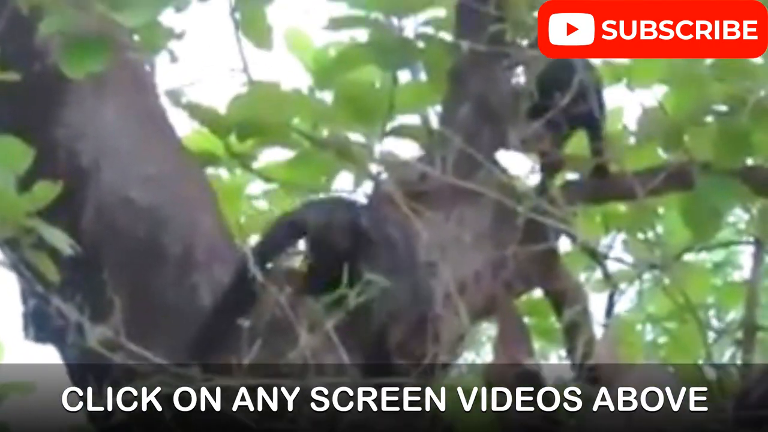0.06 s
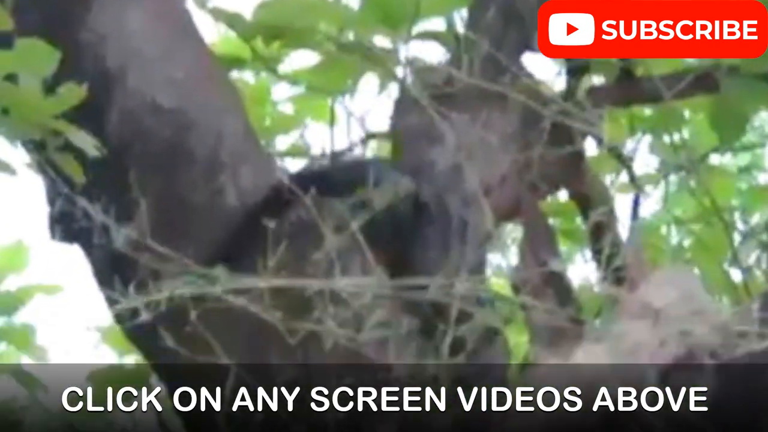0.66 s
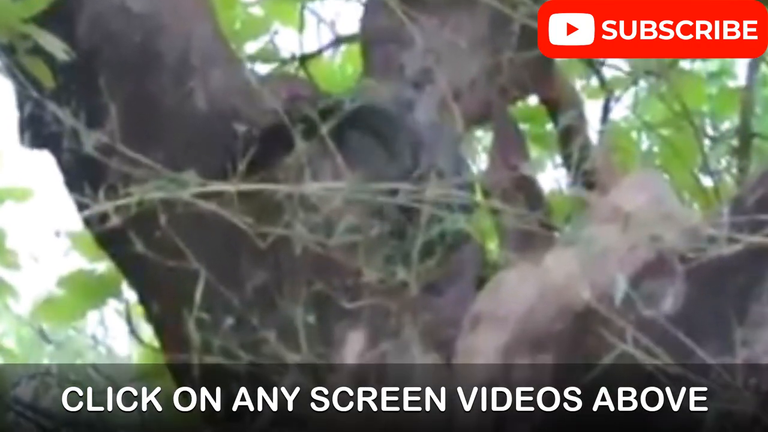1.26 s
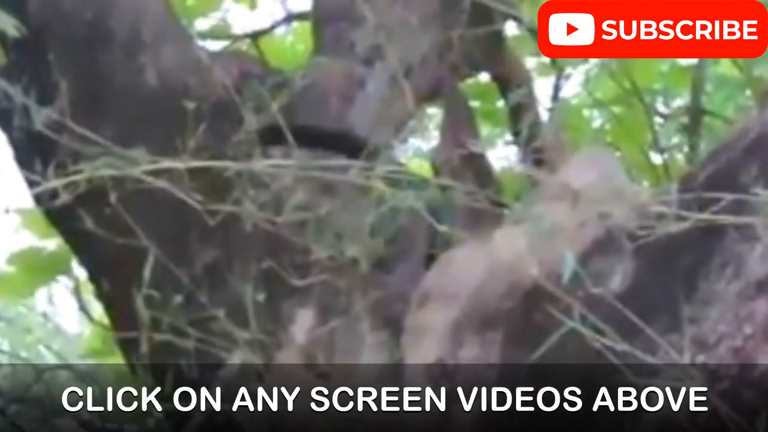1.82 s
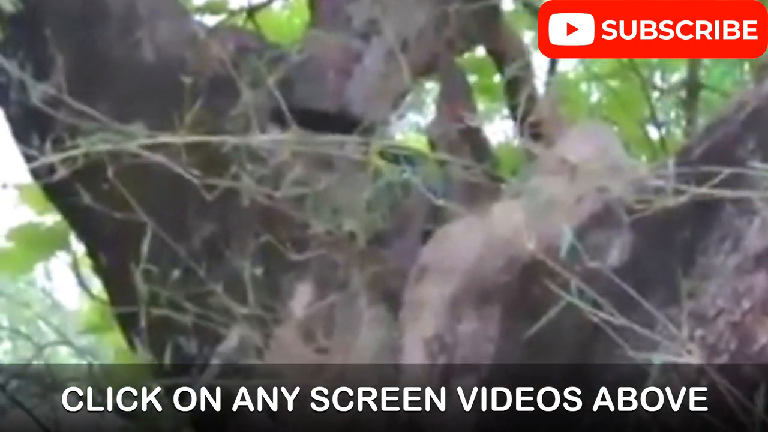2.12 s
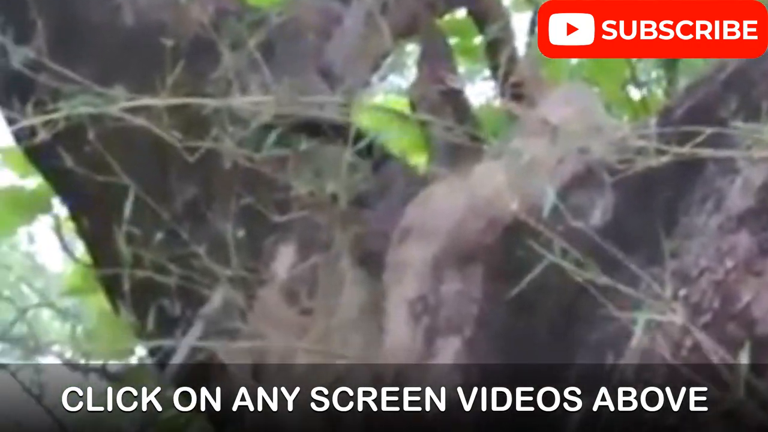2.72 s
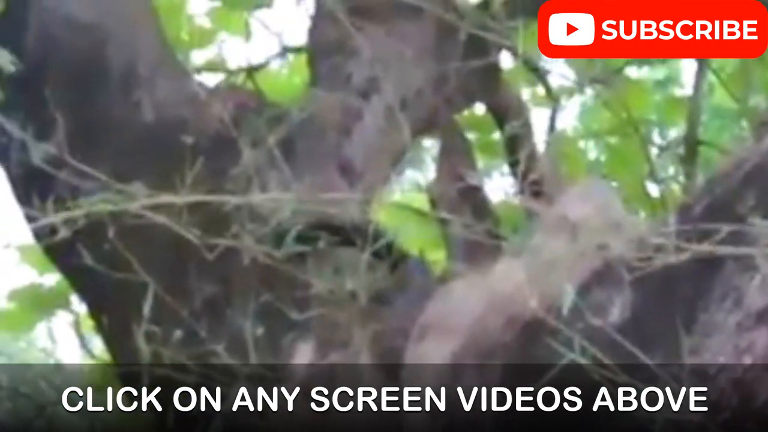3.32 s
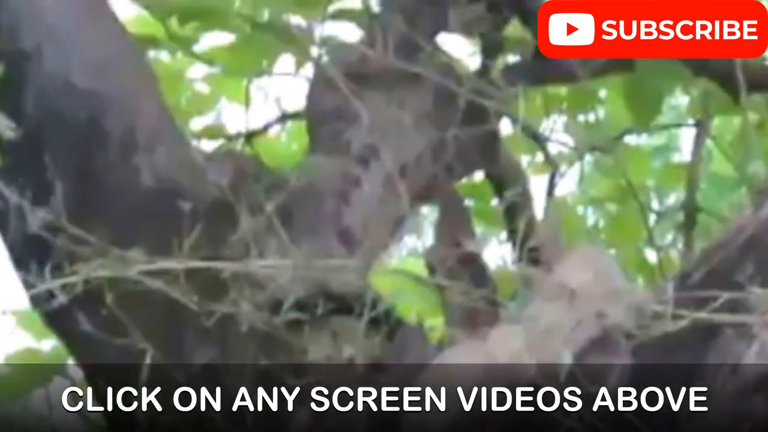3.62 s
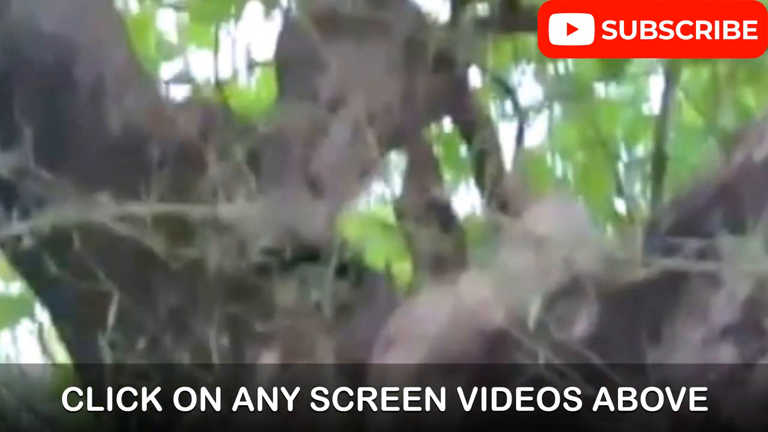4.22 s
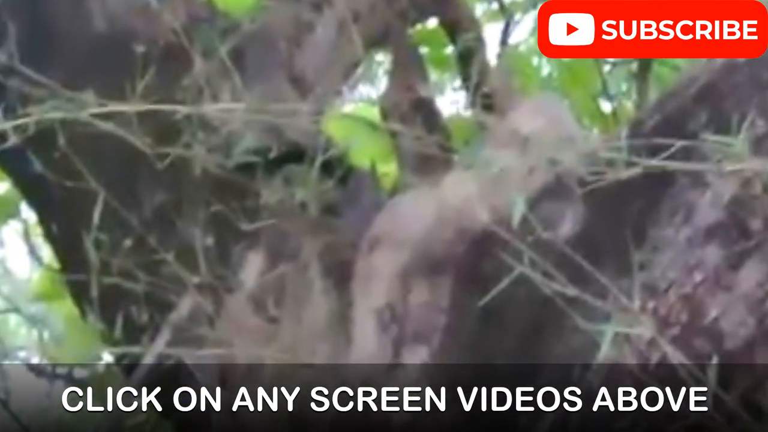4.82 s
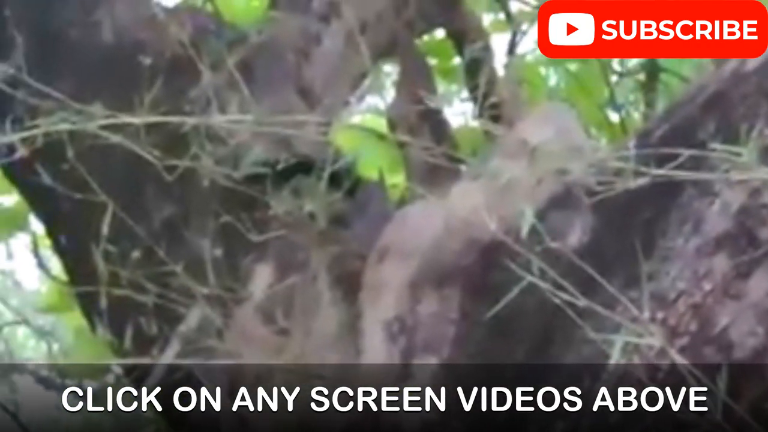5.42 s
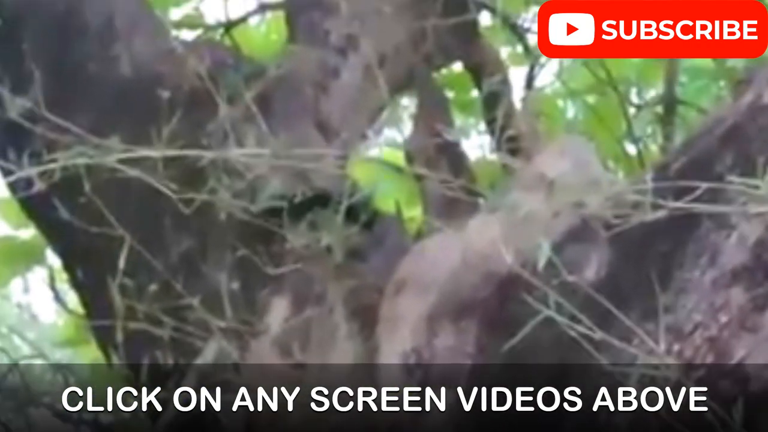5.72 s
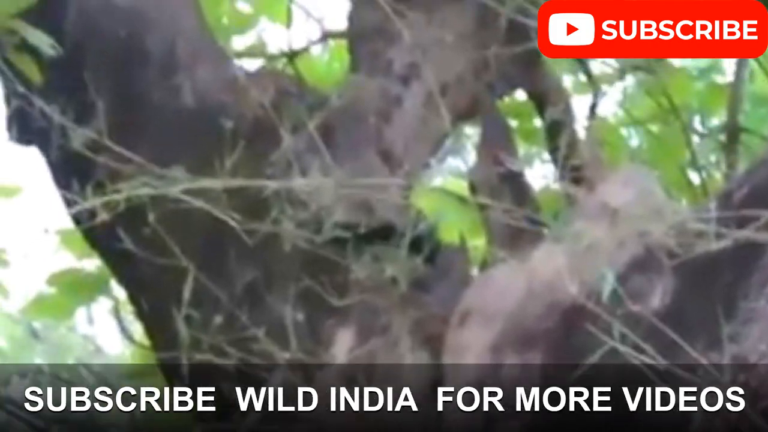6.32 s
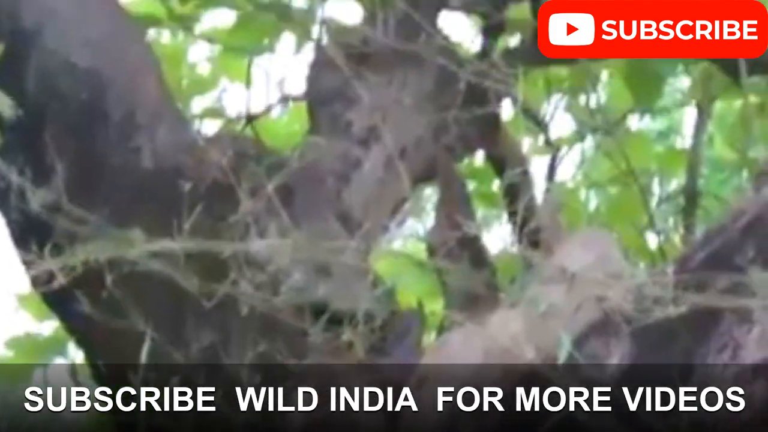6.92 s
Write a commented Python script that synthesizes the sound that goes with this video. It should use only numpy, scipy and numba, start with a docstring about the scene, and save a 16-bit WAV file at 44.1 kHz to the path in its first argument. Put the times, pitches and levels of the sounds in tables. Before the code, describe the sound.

A palm civet screeches in quick, shrill runs from a tree, pausing briefly midway, in otherwise quiet woods.

```python
"""A palm civet screeching in a tree

Pulses of the vocal folds excite the resonances of throat and mouth: each screech starts as a low creak,
sweeps up to a shriek, swings in pitch and ends in a squeak. Between screeches the animal rasps, grunts
and scrapes on the bark. Trunks and leaves scatter the sound over quiet air, soft bumps and one faint,
distant hoot, and a fast limiter holds the shrieks at one level."""
import sys
import numpy as np
from scipy import signal
from scipy.fft import rfft, irfft
from scipy.io import wavfile
from scipy.ndimage import uniform_filter1d
from numba import njit

SR = 44100
rng = np.random.default_rng(int(sys.argv[2]) if len(sys.argv) > 2 else 0)


def log_audio(samples):
    """Write samples as a 16-bit WAV file to the path given in sys.argv[1]."""
    # one column per channel
    frames = np.atleast_2d(samples).T
    # limit to full scale, then quantise
    limited = np.clip(frames, -1, 1)
    pcm = np.round(limited * 32767).astype(np.int16)
    wavfile.write(sys.argv[1], SR, pcm)


N = 306936
T = np.arange(N) / SR

# spectra of still air and of an earlier call ringing in the wood: (frequency [Hz], gain [dB])
AIR_SPECTRUM = [(25, -37), (50, -17.5), (80, -2.5), (125, 0.5), (200, -7.5), (320, -21.5), (700, -15.5),
                (1500, -35.5), (5000, -43.5), (13000, -53)]
RINGING_SPECTRUM = [(400, -22.5), (900, -26), (1280, 4), (1700, -21.5), (2400, -21.5), (3500, -10),
                    (4500, -26.5), (8000, -27.5)]
# low bumps and one faint, distant hoot; scrapes on bark and leaves:
# (peak time [s], level [dB], rise [s], t60 [s], centre [Hz])
BUMPS_AND_HOOT = [(.005, -25, .004, 0.58, 111), (.032, -24.5, .006, 0.56, 104), (.13, -23, .008, 0.17, 114),
                  (1.02, -30.5, .02, 0.55, 103.6), (1.19, -33.5, .02, 1, 120.8),
                  (3.98, -53, .01, 0.32, 560), (4.19, -43, .012, 0.13, 147.4),
                  (4.325, -48.5, .03, 0.34, 227)]
BARK_SCRAPES = [(4.165, -43.5, 0.012, 0.11, 5550), (4.205, -48, .012, 0.14, 4780),
                (4.235, -33.5, 0.0063, 0.061, 4840), (4.265, -41.5, 0.0012, 0.25, 3780)]
# reflections from the nearest limbs: (delay [s], gain [dB])
LIMB_ECHOES = [(.0013, -26.5), (.0031, -21.5), (.0083, -14.5), (0.0148, -17.5)]
# scatter from the trees: (frequency [Hz], gain [dB], t60 [s])
TREE_SCATTER = [(300, -7.5, 0.21), (676, -5.5, 0.36), (1403, -14, 0.71), (2200, -12.5, 0.55),
                (3600, -9, 0.63), (4300, -12.5, 0.58), (6450, -19.5, 0.63), (9310, -16.5, 0.48),
                (12000, -20.5, 0.48)]
# envelope of the voiceless rasp: (time [s], level [dB])
RASP_ENVELOPE = [(1.042, -57.5), (1.049, -14.5), (1.06, -24), (1.08, -21), (1.12, -21), (1.17, -22.5),
                 (1.195, -24), (1.24, -87.5)]
# its spectrum: (frequency [Hz], gain [dB])
RASP_SPECTRUM = [(150, -22), (350, -12), (550, -5.5), (900, -9), (1500, -3), (2100, -15.5), (3500, -14.5),
                 (6000, -33), (9500, -24), (13000, -47.5)]
# the airway's low, middle and high resonance regions: (frequency [Hz], gain [dB])
THROAT_RESPONSE = [(200, -38.5), (420, -7.5), (600, 0.5), (800, 1.5), (1050, 8.5), (1300, 4.5), (1600, 3.5),
                   (1900, 3.5), (2350, 5.5), (2800, -3.5), (3500, -9.5), (4400, -47.5), (7000, -95.5)]
SHRIEK_RESPONSE = [(1200, -34.5), (2200, -23.5), (3000, 6), (3700, 4), (4400, 6.5), (5500, 9), (6900, 10),
                   (7600, 12), (8600, -6.5), (11000, -31.5)]
EDGE_RESPONSE = [(4000, -70.5), (6500, -24.5), (7700, -5), (8600, -11.5), (9400, -12), (10200, -9.5),
                 (10900, -15), (11600, -16), (12800, -29.5), (14000, -10.5)]
# their balance by pitch: (pitch [Hz], throat level at a sweep's top [dB], edge relative to shriek [dB])
REGISTER_BALANCE = [(1050, -18, -11.5), (1500, -16.5, -14), (1985, -24.5, -4.5), (2560, -18, 0.5),
                    (3300, -14, 0.5)]
# rising grunts: (start [s], end [s], first pitch [Hz], last pitch [Hz], level [dB])
GRUNT_GLIDES = [(1.158, 1.19, 1150, 1550, -16.5), (2.231, 2.262, 480, 1250, -21.5),
                (4.52, 4.542, 281.2, 600, -26), (4.689, 4.712, 278.8, 600.4, -23.5)]
# screeches: (start [s], mouth opens [s], mouth shuts [s], end [s], creak pitch [Hz], creak level [dB],
# opening level [dB], opening mouth resonance [Hz], squeak pitch [Hz], squeak level [dB])
SCREECH_CALLS = [(.113, .177, .32, .342, 230, -17, -10, 4000, 1380, -12),
                 (.468, .493, .935, .968, 330, -19, -3, 4500, 1270, -8),
                 (1.317, 1.381, 1.538, 1.558, 220, -18, -12, 5000, 1600, -9),
                 (1.687, 1.712, 2.05, 2.082, 330, -21, 0, 4700, 1520, -12),
                 (2.387, 2.402, 2.757, 2.78, 280, -24, 5, 5400, 1850, -13),
                 (2.912, 2.939, 3.052, 3.138, 230, -24, -6, 5200, 1560, -13),
                 (3.31, 3.369, 3.642, 3.68, 120, -26, -3, 3800, 1560, -18),
                 (4.852, 4.892, 5.02, 5.045, 280, -19, 2, 5300, 1480, -14),
                 (5.172, 5.197, 5.655, 5.679, 230, -26, 3, 6000, 1380, -17),
                 (5.995, 6.02, 6.297, 6.324, 200, -23, 1, 5000, 1720, -16),
                 (6.636, 6.664, 6.96, 6.99, 180, -27, 4, 5400, 1640, -25)]
# swings of pitch up to a top and down to a held note: (top time [s], top pitch [Hz], rise [s], fall [s],
# held pitch [Hz], roundness [1 pointed, 2 bell], top level [dB], held level [dB],
# held throat level [dB], edge offset [dB], mouth resonance [Hz], roughness [0-1])
PITCH_SWEEPS = [(.226, 2698, .074, .056, 1324, 1.7, 6, 6, -28, -7, 5200, .35),
                (.562, 3539, .052, .042, 1328, 2.0, 10, 8, -42, -5, 5500, .15),
                (.718, 1699, .038, .031, 1494, 1.1, 6, -4, -34, -2, 5000, .25),
                (.871, 2122, .04, .05, 1044, 1.6, 5, -8, -26, -3, 4050, .45),
                (1.423, 3546, .054, .039, 1826, 1.9, 7, 2, -30, -6, 5800, .22),
                (1.486, 1968, .019, .021, 1646, 1.2, 5, 7, -28, -3, 5600, .25),
                (1.777, 3645, .049, .037, 1215, 1.9, 15, 8, -27, -3, 5800, .3),
                (1.966, 3597, .043, .039, 1299, 2.0, 0, -5, -19, 11, 5600, .4),
                (2.458, 3437, .045, .027, 1638, 1.7, 1, 3, -45, 6, 6050, .4),
                (2.591, 3467, .036, .051, 1487, 2.0, 6, 6, -44, 0, 5900, .12),
                (2.989, 3361, .034, .033, 1092, 1.6, 6, 6, -20, -2, 6000, .35),
                (3.418, 3438, .048, .036, 1365, 2.0, 10, 3, -26, -7, 5900, .33),
                (3.601, 3280, .041, .028, 1530, 2.1, 1, 4, -25, 8, 5900, .45),
                (4.953, 2764, .047, .033, 1167, 1.6, 5, 7, -28, 2, 5700, .95),
                (5.261, 2793, .051, .025, 1598, 1.7, 2, 0, -44, 2, 6500, .5),
                (5.396, 3402, .037, .036, 1314, 1.7, -5, 0, -40, 8, 6200, .25),
                (5.587, 1487, .042, .051, 1174, 2.3, 7, 5, -30, 6, 6300, .22),
                (6.07, 3644, .04, .029, 1535, 2.0, 9, 3, -40, 1, 5900, .3),
                (6.216, 3435, .037, .037, 1559, 2.3, 5, 5, -36, 2, 5900, .27),
                (6.722, 3313, .043, .023, 1527, 1.9, 12, 10, -42, -4, 6200, .2),
                (6.874, 3290, .037, .031, 1645, 2.2, 6, 10, -45, -3, 6400, .17)]
# threshold of the noise suppressor: (frequency [Hz], level [dB])
HUSH_THRESHOLD = [(60, -93.5), (200, -92.5), (400, -79), (1000, -70), (2500, -70), (5000, -72),
                  (12000, -80)]
TOP_HZ = 12900


def undb(db):
    """Amplitude ratio of a level in decibels."""
    return 10 ** (np.asarray(db) / 20)


def unit(x):
    """Normalisation to an rms of one."""
    return x / np.sqrt(np.mean(x ** 2))


def smooth(x, seconds):
    """Low-pass filtering by two running means in cascade."""
    size = 2 * int(seconds * SR / 2) + 1
    return uniform_filter1d(uniform_filter1d(x, size, mode="nearest"), size, mode="nearest")


def steady(x, seconds=0.0076):
    """Division by the running rms evens the level as harmonics cross a resonance."""
    return x / np.sqrt(np.maximum(smooth(x ** 2, seconds), 0) + np.mean(x ** 2) / 10 ** 6)


def bell(t, rise, fall, roundness):
    """Asymmetric generalised Gaussian, equal to one at t = 0."""
    return np.exp(-np.abs(t / np.where(t < 0, rise, fall)) ** roundness)


def colour(x, points, size=2048):
    """Minimum-phase filter through points of (frequency [Hz], gain [dB])."""
    hz, db = np.transpose(points)
    log_f = np.log(np.fft.rfftfreq(size, 1 / SR) + 1)
    log_gain = np.log(undb(np.interp(log_f, np.log(hz), db)))
    cepstrum = irfft(log_gain)[:size // 2]
    cepstrum[1:] *= 2
    return signal.fftconvolve(x, irfft(np.exp(rfft(cepstrum, size))))[:len(x)]


def noise(points):
    """Spectrally shaped Gaussian noise of unit rms."""
    return unit(colour(rng.standard_normal(N), points))


def flutter(seconds):
    """Random modulation of unit rms on the given time scale."""
    return unit(smooth(rng.standard_normal(N + SR), seconds)[SR // 2:SR // 2 + N])


@njit
def resonance(x, hz, width_hz):
    """Second-order resonator whose centre frequency may move every sample."""
    y, band, low = np.empty(len(x)), 0., 0.
    for i in range(len(x)):
        g, damping = np.tan(np.pi * hz[i] / SR), width_hz / hz[i]
        v = (band + g * (x[i] + 1e-18 - low)) / (1 + g * (g + damping))
        band, low = 2 * v - band, low + 2 * g * v
        y[i] = damping * v
    return y


@njit
def follow(x, attack, release):
    """Envelope detection: a one-pole lag with separate rates for rise and fall."""
    out, envelope = np.empty(len(x)), 0.
    for i in range(len(x)):
        envelope += (x[i] - envelope) * (attack if x[i] > envelope else release)
        out[i] = envelope
    return out


def air(level_db=-56, breeze_db=1.5):
    """Ambient noise: a low rumble, slowly amplitude-modulated by the breeze."""
    breeze = undb(breeze_db * flutter(.08))
    return noise(AIR_SPECTRUM) * undb(level_db) * breeze


def ringing(level_db=-27, t60=0.64):
    """Reverberant decay: the tail of an earlier call dies away exponentially."""
    return noise(RINGING_SPECTRUM) * undb(level_db) * np.exp(-np.log(1000) * T / t60)


def noise_bursts(rows, relative_width, grain_db):
    """Band-limited noise: each bump, hoot or scrape is a grainy band that swells and decays."""
    out = np.zeros(N)
    for peak_s, db, rise, t60, hz in rows:
        band = rng.standard_normal(N)
        for _ in range(2):
            band = resonance(band, np.full(N, float(hz)), float(hz * relative_width))
        age = T - peak_s
        envelope = np.exp(np.minimum(age, 0) / rise - np.log(1000) * np.maximum(age, 0) / t60)
        out += undb(db) * unit(band) * envelope
    return out * undb(grain_db * flutter(0.00017))


def wood(x, build_s=.018, steepening=1.397):
    """Reflection and scattering: near limbs echo at once, and the trees add a diffuse tail."""
    t = T[:SR]
    hz, db, t60 = np.transpose(TREE_SCATTER)
    log_f = np.log(np.fft.rfftfreq(SR, 1 / SR) + 1)
    spectrum = rfft(rng.standard_normal(SR))
    response = np.zeros(SR)
    for k, share in enumerate(np.eye(len(hz))):
        band = irfft(spectrum * np.interp(log_f, np.log(hz), share), SR)
        # the echo tail builds up, then dies away ever faster
        shape = (1 - np.exp(-(t / build_s) ** 2)) * np.exp(-np.log(1000) * (t / t60[k]) ** steepening)
        response += undb(db[k]) * band * shape / np.sqrt(np.sum(shape ** 2))
    for delay, echo_db in LIMB_ECHOES:
        response[int(delay * SR)] += undb(echo_db)
    return x + signal.fftconvolve(x, response)[:N]


def rasp(rattle_db=3):
    """Voiceless excitation: noise under random amplitude modulation makes a harsh, rattling spit."""
    times, db = np.transpose(RASP_ENVELOPE)
    sounding = (T > times[0]) & (T < times[-1])
    return noise(RASP_SPECTRUM) * undb(np.interp(T, times, db) + rattle_db * flutter(0.0048)) * sounding


def grunt(t, row, rough=.45, mouth_hz=5500, leak_db=-36, edge_db=-25):
    """Closed-mouth phonation: voice controls for an exponential pitch glide, nearly all throat."""
    start, end, first_hz, last_hz, db = row
    pitch = first_hz * (last_hz / first_hz) ** ((t - start) / (end - start))
    return np.broadcast_arrays(pitch, rough, mouth_hz, db, db + leak_db, edge_db)


def screech(t, row, creak_rough=.707, swell_db_per_s=39.5, leak_db=(-44.5, -13.5), shut_db=-14.5,
            mouth_sag=.94, squeak_s=.018, squeak_rough=.6, slack_s=.0046, slack_octaves=.15):
    """Coupled articulation: one push moves pitch, roughness, mouth resonance and levels together."""
    start, opens, shuts, end, creak_hz, creak_db, opening_db, opening_hz, squeak_hz, squeak_db = row
    register_hz, register_throat, register_edge = np.transpose(REGISTER_BALANCE)
    opening_throat_db = creak_db - 4.5  # the throat gives way as the mouth opens
    opening = [creak_hz, opening_db, opening_throat_db, 0, opening_hz, creak_rough]
    state = np.outer(opening, np.ones(len(t)))
    for (top_s, top_hz, rise, fall, held_hz, roundness,
         top_db, held_db, throat_db, edge_db, mouth_hz, roughness) in PITCH_SWEEPS:
        if start < top_s < end:
            top_throat_db = np.interp(top_hz, register_hz, register_throat)
            top = np.c_[[top_hz, top_db, top_throat_db, edge_db, mouth_hz, roughness]]
            held = np.c_[[held_hz, held_db, throat_db, edge_db, mouth_hz * mouth_sag, roughness]]
            state = np.where(t < top_s, state, held)
            state = state + (top - state) * bell(t - top_s, rise, fall, roundness)
    pitch, shriek, throat, edge, mouth, rough = state
    # the folds first flap slowly; the creak and a leak of shriek grow until the mouth opens
    pitch = pitch + (creak_hz - pitch) * bell(t - start, .015, .015, 4)
    throat = np.where(t < opens, creak_db + swell_db_per_s * (t - (start + opens) / 2), throat)
    shriek = np.where(t < shuts, shriek, shut_db)
    shriek = np.where(t < opens, np.interp(t, [start, opens], leak_db), shriek)
    edge = edge + np.interp(pitch, register_hz, register_edge)
    # the closing squeak is hoarse; its pitch hooks, then sags as the folds go slack
    squeak = bell(t - end + .008, squeak_s, squeak_s, 4)
    rough = rough + (squeak_rough - rough) * squeak
    throat = throat + (squeak_db - throat) * squeak
    pitch = pitch + (squeak_hz - pitch) * bell(t - end + .011, .008, .016, 2)
    pitch = pitch * 2 ** (-slack_octaves * np.exp((t - end) / slack_s))
    return pitch, rough, mouth, throat, shriek, edge


def articulation():
    """Gestures in sequence: six control tracks, and a gate that is open while the folds vibrate."""
    calls = [(row[0], row[3], screech, row) for row in SCREECH_CALLS]
    calls += [(row[0], row[1], grunt, row) for row in GRUNT_GLIDES]
    tracks, gate = np.zeros((6, N)), np.zeros(N)
    first = 0
    for start, end, gesture, row in sorted(calls, key=lambda call: call[0]):
        last = min(int((end + .03) * SR), N)
        tracks[:, first:last] = gesture(np.clip(T[first:last], start, end), row)
        gate[int(start * SR):int(end * SR)] = 1
        first = last
    return tracks, gate


def vocal_folds(pitch, rough, glide_s=.0016):
    """Jitter and shimmer: pulses of equal harmonics vary in period and strength; gives phase too."""
    pitch = smooth(pitch, glide_s) * np.exp(.006 * flutter(.004) + .007 * flutter(.009))
    pitch = pitch * np.exp(.035 * rough * flutter(.0005))
    slack_jitter = .005 + .11 * np.exp(-(pitch / 650) ** 2)  # slow folds are the least regular
    pitch = pitch * np.exp(slack_jitter * flutter(.002))
    phase = 2 * np.pi * np.cumsum(pitch) / SR
    pulses = np.zeros(N)
    for k in range(1, int(TOP_HZ / pitch.min()) + 1):
        in_band = k * pitch < TOP_HZ + 1000
        pulses[in_band] += np.cos(k * phase[in_band])
    return steady(pulses) * (1 + .5 * rough * flutter(.0007)), phase


def voice(jaw_s=.0048, shimmer_db=2, doubling=.11, hiss_db=-12, mouth_width_hz=3000., fundamental_db=-12,
          pharynx_hz=1400., pharynx_width_hz=300., pharynx_db=4, throat_trim_db=-1):
    """Source and filter: fold pulses, slow as a creak or fast as a whistle, ring throat and mouth."""
    (pitch, rough, mouth_hz, throat_db, shriek_db, edge_db), gate = articulation()
    rough = np.clip(rough, 0, 1)
    throat_db = smooth(throat_db, jaw_s) + throat_trim_db
    shriek_db = smooth(shriek_db, jaw_s) + shimmer_db * flutter(0.0095)
    pulses, phase = vocal_folds(pitch, rough)
    # in rough voicing strong and weak pulses alternate and air hisses through
    source = pulses * (1 + doubling * rough ** 2 * np.cos(phase / 2))
    source += undb(hiss_db) * rough * rng.standard_normal(N)
    mouth = colour(source, SHRIEK_RESPONSE)
    for _ in range(2):
        mouth = resonance(mouth, mouth_hz, mouth_width_hz)
    # the throat favours the fundamental; the pharynx rings on between the slow pulses of a creak
    throat = colour(pulses + undb(fundamental_db) * np.cos(phase), THROAT_RESPONSE)
    throat += undb(pharynx_db) * resonance(throat, np.full(N, pharynx_hz), pharynx_width_hz)
    body = undb(throat_db) * steady(throat)
    shriek = undb(shriek_db) * steady(mouth)
    edge = undb(shriek_db + edge_db) * steady(colour(source, EDGE_RESPONSE))
    return (body + shriek + edge) * smooth(gate, .003)  # the folds take a few cycles to start and stop


def scene():
    """Superposition: the animal and its echoes over a quiet background, alike in both channels."""
    animal = voice() + rasp() + noise_bursts(BARK_SCRAPES, relative_width=.77, grain_db=6)
    background = ringing() + air() + noise_bursts(BUMPS_AND_HOOT, relative_width=.51, grain_db=2.5)
    mono = wood(animal) + background
    return np.array([mono, mono])


def suppress(x, size=1024):
    """Spectral gating: bands whose power sinks below the threshold are attenuated."""
    hz, _, spectrum = signal.stft(x, SR, nperseg=size)
    power = uniform_filter1d(np.abs(spectrum) ** 2, size=7, axis=-2)
    power = uniform_filter1d(power, size=3, axis=-1).clip(0)
    threshold = undb(np.interp(hz, *np.transpose(HUSH_THRESHOLD)))[:, None] ** 2
    return signal.istft(spectrum * power / (power + threshold), SR, nperseg=size)[1][:, :N]


def record(dry, ceiling=0.82, attack_s=.0001, release_s=0.013):
    """Peak limiting holds the shrieks down; stray peaks clip, faint noise is muted and the top is cut."""
    envelope = follow(np.abs(dry).max(axis=0), min(1 / (attack_s * SR), 1.), 1 / (release_s * SR))
    limited = np.clip(dry * ceiling / np.maximum(envelope, ceiling), -ceiling, ceiling)
    low_pass = signal.ellip(10, .2, 80, TOP_HZ, fs=SR, output="sos")
    return signal.sosfilt(low_pass, suppress(limited))


dry = scene()
out = record(dry)
log_audio(out)
```